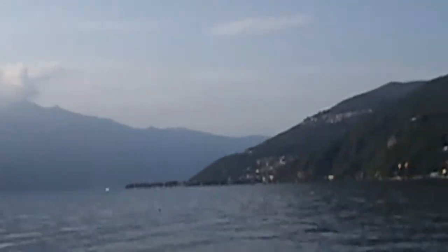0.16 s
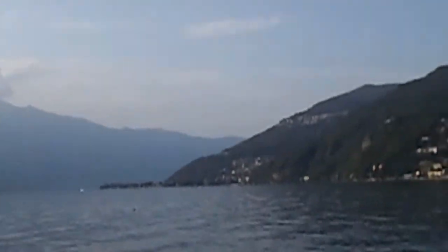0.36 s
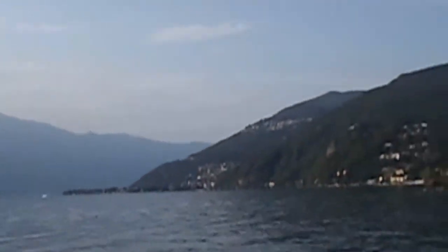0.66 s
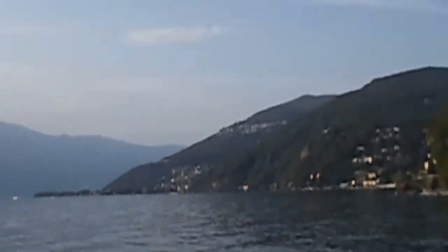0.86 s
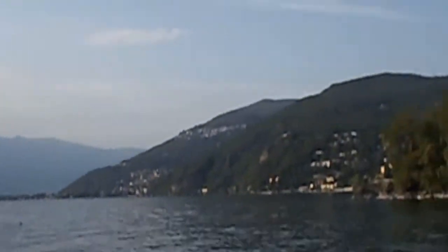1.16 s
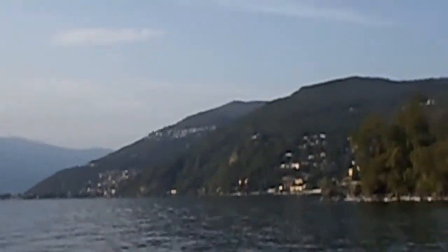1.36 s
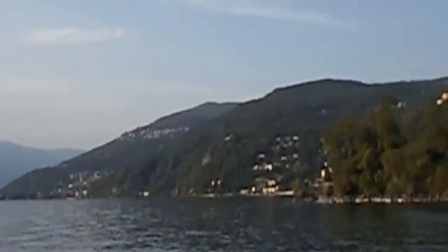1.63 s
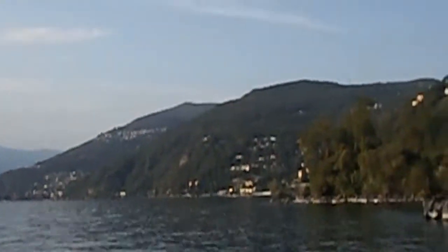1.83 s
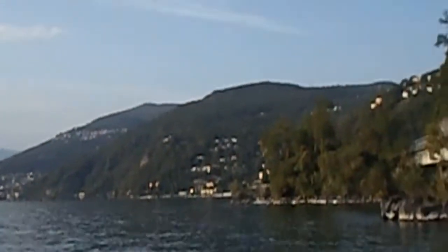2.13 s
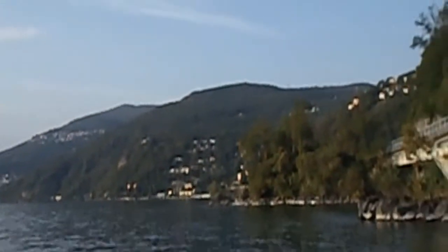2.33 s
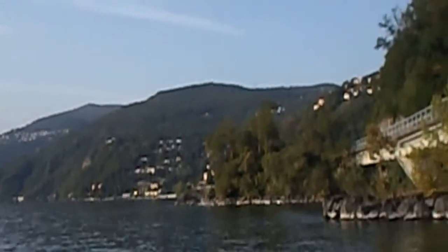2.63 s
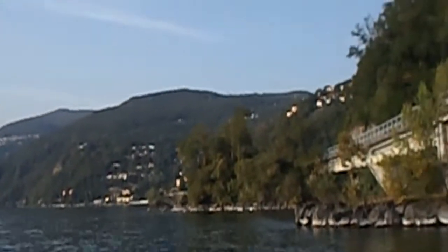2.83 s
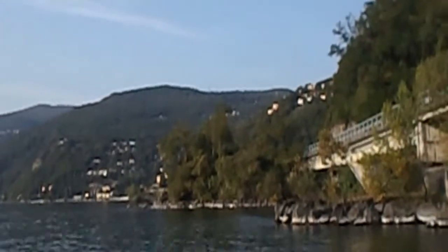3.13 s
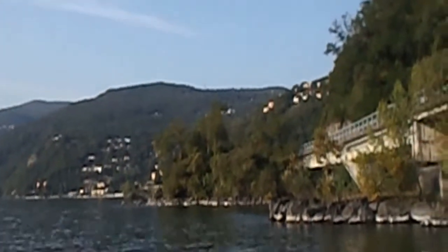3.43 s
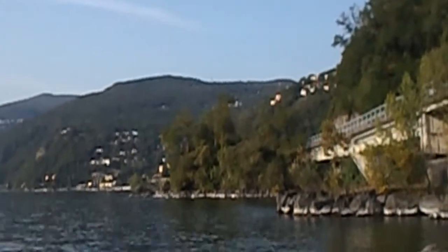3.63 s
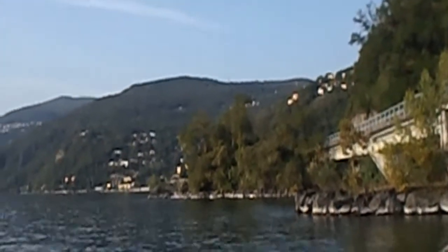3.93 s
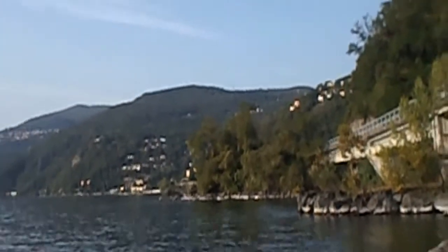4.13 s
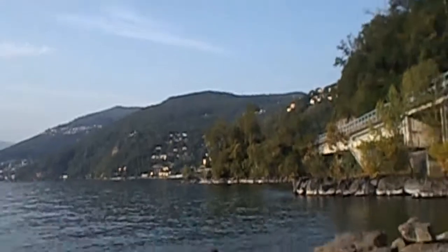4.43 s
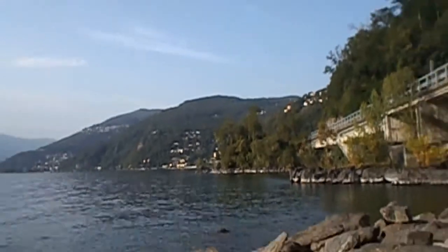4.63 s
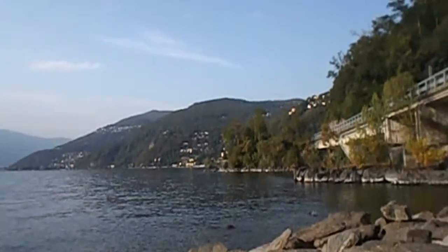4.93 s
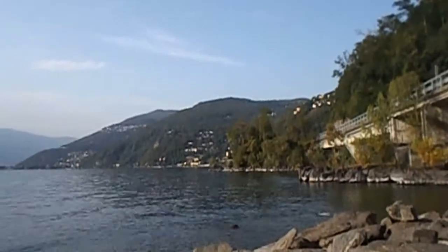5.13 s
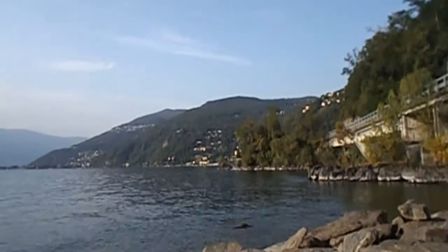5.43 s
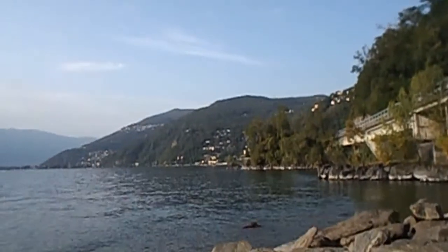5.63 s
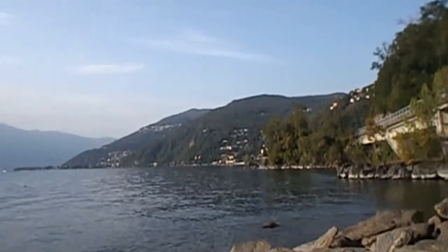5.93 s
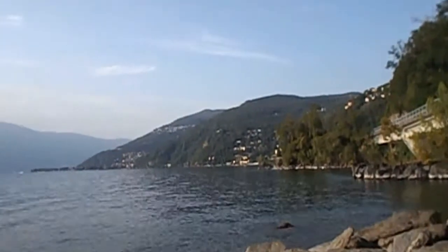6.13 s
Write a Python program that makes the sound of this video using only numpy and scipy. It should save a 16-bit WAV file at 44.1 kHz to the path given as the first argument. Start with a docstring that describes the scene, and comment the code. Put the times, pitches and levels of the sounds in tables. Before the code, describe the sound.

Gentle water washes over shoreline stones, plopping and glugging, while a handheld plastic camera case briefly creaks and snaps sharply over faint wind.

```python
"""Small waves lap a rocky lake shore: crowds of ringing bubbles and filtered noise swell with each wavelet.
Noise bursts slap the stones; single ringing bubbles make plops, hollow glugs and droplet ticks.
A hand-held camera's plastic case creaks in two strokes of stick-slip pushes on damped modes, and snaps
in hard clicks, one far louder than the rest. Light wind, as slowly drifting low noise, rumbles on the microphone."""
import sys
import numpy as np
from scipy import signal
from scipy.fft import rfft, irfft, next_fast_len
from scipy.io import wavfile
from scipy.ndimage import uniform_filter1d

SR = 44100
rng = np.random.default_rng(int(sys.argv[2]) if len(sys.argv) > 2 else 0)


def store_wav(level_fs):
    """Save 16-bit WAV to argv[1]."""
    pcm = np.round(np.clip(np.atleast_2d(level_fs), -1, 1) * 32767)
    wavfile.write(sys.argv[1], SR, pcm.T.astype(np.int16))


N = 276507
T = np.arange(N) / SR  # time [s]


def undb(db):
    """Level law: decibels to amplitude gain."""
    return 10 ** (np.asarray(db) / 20)


def unit(x):
    """Normalisation: scale to an rms of 1."""
    return x / np.sqrt(np.mean(x ** 2))


def add(out, start_s, sound):
    """Superposition: mix a short sound in at its start time."""
    i = int(np.clip(start_s * SR, 0, N - 1))
    out[i:i + len(sound)] += sound[:N - i]


def colour(x, spectrum):
    """Linear filtering: weight a sound by a spectrum, interpolated over log frequency; rms 1."""
    hz, db = np.transpose(spectrum)
    size = next_fast_len(N)
    bins_hz = np.maximum(np.fft.rfftfreq(size, 1 / SR), 1)
    gain = undb(np.interp(np.log(bins_hz), np.log(hz), db))
    return unit(irfft(rfft(x, size) * gain, size)[:N])


def walk(rate):
    """Smoothed random process: drift with a spread near 1 and `rate` new targets per second."""
    hold = max(int(SR / rate), 1)
    targets = rng.standard_normal(N)[:N // hold + 1]
    return 1.4 * uniform_filter1d(np.repeat(targets, hold), hold)[:N]


def bubble(hz, cycles, rise):
    """Bubble resonance: an air pocket rings down by 60 dB, its pitch rising as it nears the surface."""
    age = np.arange(int(cycles * SR / hz) + 2) * hz / SR  # in cycles of the starting pitch
    life = age / cycles
    onset = 1 - np.exp(-4 * age)
    decay = np.exp(-np.log(1000) * life)
    return onset * decay * np.sin(2 * np.pi * age * (1 + rise * life / 2))


def froth(low_hz, high_hz, cycles, spread_db, count):
    """Incoherent summation: countless short rings of all pitches, most faint and a few strong."""
    out = np.zeros(N)
    for when, size, luck, ring in rng.random((count, 4)):
        strength = undb(-spread_db * np.log(1 - .99 * luck))
        hz = low_hz * (high_hz / low_hz) ** size
        add(out, when * N / SR, strength * bubble(hz, cycles * (.5 + ring), 0.42))
    return unit(out)


def water(near, spectrum, far_db, flicker_db):
    """Near and far field: near detail over the smooth rush of the shore further off."""
    rush = undb(far_db) * rng.standard_normal(N)
    return colour(near + rush, spectrum) * undb(flicker_db * walk(25))


# wavelets reaching the stones: crest_s [s], wash_db [dB], rise_s [s], drain_s [s],
# spray_db [dB against the wash], gurgle_db [dB against the wash]
WAVELETS = [(0.02, -47, 0.11, 0.5, -16, -9), (0.67, -48, 0.82, 0.94, -5.5, -11),
            (1.09, -48, 0.11, .7, -3.5, -9.5), (1.63, -54.5, 0.045, 0.12, 0, -13),
            (2.16, -48.5, .22, 0.36, -5.5, -5.5), (2.58, -48.5, 0.22, .6, -3.3, -8),
            (2.8, -47, 0.038, 0.085, -2.5, -3), (2.965, -42, 0.04, 0.096, 0.5, -4),
            (3.16, -47, 0.087, .075, -8, 1), (3.3, -44.5, 0.17, 0.28, -3.5, -6.5),
            (3.48, -43.5, 0.2, 0.18, -4, -11), (3.81, -47, .05, 0.077, -4, -12),
            (4.85, -54, .034, 0.1, -12, -2), (5.125, -46.8, 0.081, 0.16, -4.5, -7),
            (5.39, -46.5, 0.11, .145, 0, -19), (5.555, -42.5, 0.051, 0.23, -3.5, -1.5),
            (5.76, -49.5, 0.076, 0.24, -3, 0), (5.98, -48.5, .056, .25, -9, -18),
            (6.23, -50.5, .05, 0.37, -5, -14)]


def swell(shore_db, share_db):
    """Energy addition: the powers of wavelets that rise to a crest and drain add to the steady shore's."""
    t = T[::100]
    power = np.full(len(t), undb(shore_db) ** 2)
    for (crest_s, db, rise_s, drain_s, *_), share in zip(WAVELETS, share_db):
        distance = np.maximum((crest_s - t) / rise_s, (t - crest_s) / drain_s)
        power += (undb(db + share) * np.exp(-distance)) ** 2
    return np.interp(T, t, np.sqrt(power))


# spectrum of water washing over the stones: frequency_hz [Hz], density_db [dB per Hz]
WASH_SPECTRUM = [(250, -33), (500, -8), (730, 4.5), (1000, -2.1), (1300, -0.4), (2000, -1), (2900, -4),
                 (4000, -9), (6000, -30)]
# spectrum of the fizz of breaking wavelets up to 7 kHz, and of a thin treble flicker above 7 kHz: frequency_hz
# [Hz], density_db [dB per Hz]
SPRAY_SPECTRUM = [(1500, -14), (2500, -0.5), (3500, 0.5), (4500, 0), (5500, -3), (6300, -7), (7500, -1.5),
                  (9000, -16.5), (11000, -4.5), (12000, -25)]
# spectrum of water gurgling in the gaps: frequency_hz [Hz], density_db [dB per Hz]
GURGLE_SPECTRUM = [(120, -22), (200, -6), (300, 0.5), (450, 0), (650, 3), (1000, -10), (2000, -103)]


def lapping():
    """Bubble acoustics: each wavelet washes over the stones, fizzes as it breaks and gurgles in the gaps."""
    *_, spray_db, gurgle_db = np.transpose(WAVELETS)
    wash_bubbles = froth(839, 3230, cycles=22.2, spread_db=3.1, count=2500)
    wash = water(wash_bubbles, WASH_SPECTRUM, far_db=8.0, flicker_db=0.68)
    fizz = froth(3040, 11900, cycles=15, spread_db=3.0, count=3000)
    # thin treble tones flicker above 8 kHz, rising and falling with the spray's level
    treble_flicker = froth(8000, 10400, cycles=4.2, spread_db=3.5, count=1100)
    spray = water(fizz + undb(-0.5) * treble_flicker, SPRAY_SPECTRUM, far_db=3.5, flicker_db=1.27)
    gurgle_bubbles = froth(201.5, 780, cycles=16, spread_db=2.0, count=600)
    gurgle = water(gurgle_bubbles, GURGLE_SPECTRUM, far_db=14.5, flicker_db=0.98)
    # the shore levels are the steady lapping further along
    wash_level = swell(shore_db=-52.5, share_db=np.zeros(len(WAVELETS)))
    spray_level = swell(shore_db=-58.5, share_db=spray_db)
    gurgle_level = swell(shore_db=-57, share_db=gurgle_db)
    return wash * wash_level + spray * spray_level + gurgle * gurgle_level


# wavelets smacking against a stone face: start_s [s], level_db [dB]
SLAP_EVENTS = [(2.926, -39), (2.967, -32.5), (2.981, -36), (2.996, -38), (3.265, -29), (3.515, -35),
               (5.542, -36)]
# spectrum of a slap: frequency_hz [Hz], density_db [dB per Hz]
SLAP_SPECTRUM = [(200, -31), (600, -9), (1500, 13), (3200, 3.5), (5500, -27), (10000, -41)]


def slaps(fade_s=0.0054):
    """Impact noise: sheets of water burst into a short spray of exponentially fading noise."""
    envelope, t = np.zeros(N), T[:SR // 10]
    for start_s, db in SLAP_EVENTS:
        add(envelope, start_s, undb(db) * np.exp(-t / fade_s))
    return envelope * colour(rng.standard_normal(N), SLAP_SPECTRUM)


def crack(fade_s=0.0017, low_hz=7000):
    """Impulsive radiation: a bright burst of noise a few milliseconds long."""
    t = T[:SR // 100]
    bright = signal.butter(4, low_hz, "high", fs=SR, output="sos")
    return signal.sosfilt(bright, rng.standard_normal(len(t)) * np.exp(-t / fade_s))


def splashes(table, cycles, gain_db, rise, twin_db, spatter_db, spatter_s, crack_db):
    """Bubble entrainment: each bubble cracks, sheds a smaller twin and draws a spatter back from the rocks."""
    out, t = np.zeros(N), T[:SR // 10]
    for start_s, db, hz in table:
        band = signal.butter(2, [hz * 0.48, hz * 1.76], "band", fs=SR, output="sos")
        spatter = unit(signal.sosfilt(band, rng.standard_normal(len(t)))) * np.exp(-t / spatter_s)
        smaller, later = rng.random(2)
        twin = bubble(hz * (1.38 + 0.58 * smaller), cycles, rise)
        add(out, start_s, undb(db + gain_db) * bubble(hz, cycles, rise))
        add(out, start_s + 0.0024 * later, undb(db + twin_db) * twin)
        add(out, start_s, undb(db + spatter_db) * spatter)
        add(out, start_s, undb(db + crack_db) * crack())
    return out


# air pockets closing: start_s [s], level_db [dB before the gains of each part], pitch_hz [Hz at the start]
PLOP_EVENTS = [(0.601, -41, 1740), (0.67, -38, 1280), (1.115, -31.5, 2140), (1.335, -37.5, 880),
               (1.409, -37.5, 590), (2.164, -28, 1990), (2.609, -31, 2000), (3.146, -32, 890),
               (3.263, -33, 2320), (3.268, -28, 1970), (3.514, -27, 753), (3.56, -32, 1210),
               (3.595, -35, 1100), (3.865, -32.5, 675), (3.919, -23, 1700), (4.012, -35.5, 2050),
               (4.58, -31.5, 770), (4.838, -35, 2500), (5.445, -27, 2030), (5.856, -33, 680),
               (6.034, -28, 975), (6.243, -37, 1340)]


def plops():
    """Cavity closure: trapped air pockets ring long, with a slight rise in pitch."""
    return splashes(PLOP_EVENTS, cycles=28, gain_db=1.0, rise=0.041, twin_db=-12.0,
                    spatter_db=-12, spatter_s=0.0089, crack_db=-15.5)


# water slapping into hollows under the stones: start_s [s], level_db [dB before the gains of each part],
# pitch_hz [Hz at the start]
GLUG_EVENTS = [(2.953, -37, 348), (2.963, -37.5, 197), (2.995, -32.5, 332), (3.128, -41, 296),
               (3.178, -35.5, 302), (3.474, -42, 298), (5.553, -29.5, 510), (5.564, -32, 398),
               (5.644, -41, 556), (5.679, -39, 248)]


def glugs():
    """Hollow resonance: water slaps into hollows under the stones, with a marked rise in pitch."""
    return splashes(GLUG_EVENTS, cycles=12, gain_db=4.5, rise=0.22, twin_db=-6.5,
                    spatter_db=-26, spatter_s=.015, crack_db=-22)


# droplets hitting rock: start_s [s], level_db [dB before the gains of each part], pitch_hz [Hz at the start]
TICK_EVENTS = [(0.028, -26, 3160), (1.2988, -28.5, 4000), (1.6332, -35.5, 4160), (1.6764, -30.5, 4170),
               (1.8941, -22.5, 4100), (2.0512, -32, 3070), (2.0857, -35.5, 2870), (2.5688, -25.5, 4830),
               (2.574, -18, 4670), (3.5644, -27.5, 4200), (3.937, -34, 3840), (4.5815, -32.5, 3100),
               (4.5922, -24, 4600), (5.3842, -36, 3280), (5.5434, -37, 4380), (5.9354, -34.5, 2800)]


def ticks():
    """Droplet impact: brief high rings, each with a faint bright crack."""
    return splashes(TICK_EVENTS, cycles=13.5, gain_db=7.0, rise=0.082, twin_db=-3,
                    spatter_db=-19.0, spatter_s=0.0065, crack_db=-11.5)


def modes(table, build_s):
    """Modal superposition: damped modes build up after a push and ring down."""
    t = T[:SR // 20]
    ring = np.zeros(len(t))
    for hz, t60_s, db in table:
        ring += undb(db) * np.exp(-np.log(1000) * t / t60_s) * np.sin(2 * np.pi * hz * t)
    return ring * (1 - np.exp(-t / build_s))


# modes of the plastic case: pitch_hz [Hz], t60_s [s], level_db [dB]
CASE_MODES = [(1385, .014, -0.5), (2040, 0.0077, 6.5), (2290, 0.0096, 0.5), (2620, 0.012, -10),
              (3320, 0.0099, -7.5), (3980, 0.011, -12.5), (5300, 0.009, -19.5)]


def case_ring():
    """Impulse response: the plastic case after one push; peak 1."""
    ring = modes(CASE_MODES, build_s=0.00065)
    return ring / np.abs(ring).max()


# the case slipping in the grip: start_s [s], length_s [s], first_rate [slips per s],
# final_rate [slips per s, approached], level_db [dB], fade [dB per s]
CREAK_STROKES = [(4.1135, .07, 135, 335, -26, 88), (4.197, .036, 240, 340, -25.5, 20)]
# the rubbed wall, three flexing modes and two thin edge tones: pitch_hz [Hz], t60_s [s], level_db [dB]
WALL_MODES = [(323, 0.021, -8), (660, 0.023, -5), (922, 0.031, -10), (4090, 0.01, -14), (4930, 0.0073, -6)]


def creak(jitter=0.057, scatter_db=2.0, wall_db=-2, soft_hz=5200, speedup_s=.027):
    """Stick-slip friction: quickening gritty slips ring the case and flex its wall; the grip dulls the top."""
    pushes = np.zeros(N)
    grit_gain = undb(-16) / 2
    for start_s, length_s, first_rate, final_rate, db, fade in CREAK_STROKES:
        age = 0
        for late, strong, *grit in rng.standard_normal((40, 66)):
            fading_grit = grit_gain * np.array(grit) * np.linspace(1, 0, len(grit))
            push = np.r_[1, fading_grit]
            if age < length_s:
                add(pushes, start_s + age, undb(db - fade * age + scatter_db * strong) * push)
            rate = final_rate + (first_rate - final_rate) * np.exp(-age / speedup_s)
            age += (1 + jitter * late) / rate
    body = case_ring() + undb(wall_db) * modes(WALL_MODES, build_s=0.00026)
    grip = signal.butter(8, [120, soft_hz], "band", fs=SR, output="sos")
    return signal.sosfilt(grip, signal.fftconvolve(pushes, body)[:N])


# the case snapping into place and rattling: start_s [s], level_db [dB],
# pitch_ratio [ratio applied to the mode pitches], crack_db [dB against the ring]
SNAP_EVENTS = [(4.126, -25, 1.06, -1), (4.2341, -14.5, 1.18, -18.5), (5.0460, -2, 0.998, -13),
               (5.05, -23, 1.2, -20), (5.0623, -28, 1.13, -24)]


def snaps(tail_db=-28, tail_s=0.014):
    """Impulse excitation: hard clicks ring the case, most at raised mode pitches; each leaves a faint shiver."""
    out, t = np.zeros(N), T[:SR // 20]
    for start_s, db, pitch_ratio, crack_db in SNAP_EVENTS:
        ring = np.interp(t * pitch_ratio, t, case_ring())
        rattle = signal.fftconvolve(rng.standard_normal(len(t)), ring)[:len(t)]
        shiver = unit(rattle) * np.exp(-t / tail_s)
        add(out, start_s, undb(db) * (ring + undb(tail_db) * shiver))
        add(out, start_s, undb(db + crack_db) * crack())
    # so small a part radiates little bass
    return signal.sosfilt(signal.butter(1, 700, "high", fs=SR, output="sos"), out)


# spectrum of wind on the microphone: frequency_hz [Hz], density_db [dB per Hz]
WIND_SPECTRUM = [(20, -56), (35, -16), (60, -4.5), (120, 0), (160, -2.5), (210, -4), (400, -18.5),
                 (1000, -17), (4000, -72)]


def wind(level_db=-53.5, gust_db=0.9):
    """Flow noise: a light breeze rumbles on the microphone, its level drifting slowly."""
    return colour(rng.standard_normal(N), WIND_SPECTRUM) * undb(level_db + gust_db * walk(3.89))


def scene():
    """Superposition: water, the handled camera and the breeze."""
    shore = lapping() + slaps() + plops() + glugs() + ticks()
    camera = creak() + snaps()
    return (shore + camera + wind())[None]


def record(dry, knee_hz=6500, leak_db=-12.5, top_hz=11500):
    """Band limiting: the camera passes little above its knee and cuts the top."""
    low = signal.sosfilt(signal.butter(14, knee_hz, fs=SR, output="sos"), dry)
    leak = signal.sosfilt(signal.butter(14, knee_hz, "high", fs=SR, output="sos"), dry)
    top_cut = signal.ellip(8, .2, 60, top_hz, fs=SR, output="sos")  # 0.2 dB ripple, 60 dB rejection
    return signal.sosfilt(top_cut, low + undb(leak_db) * leak)


dry = scene()
out = record(dry)
store_wav(out)
```